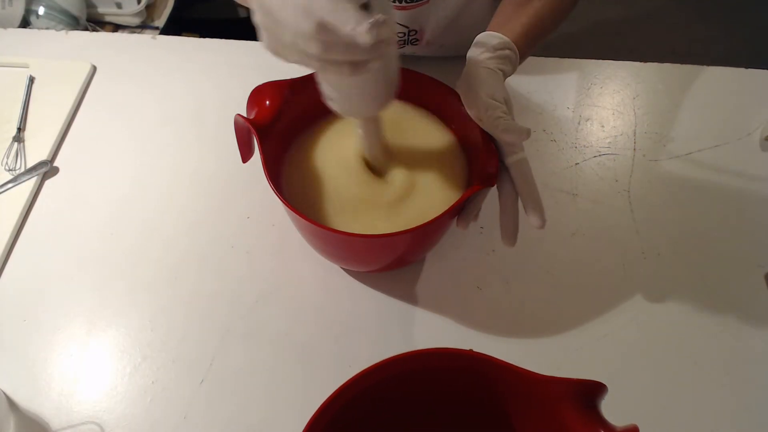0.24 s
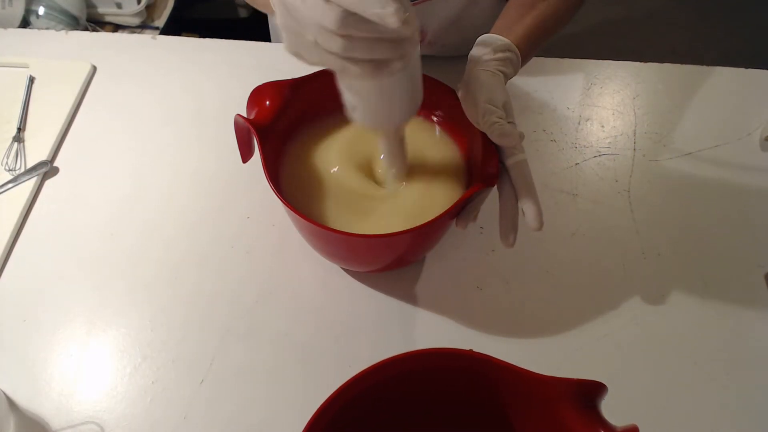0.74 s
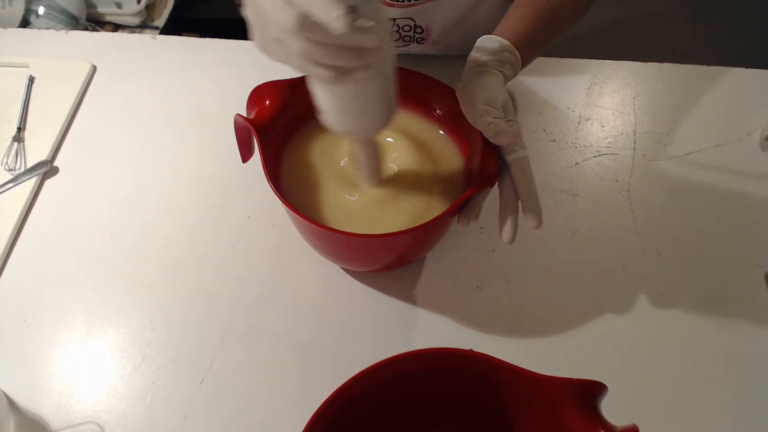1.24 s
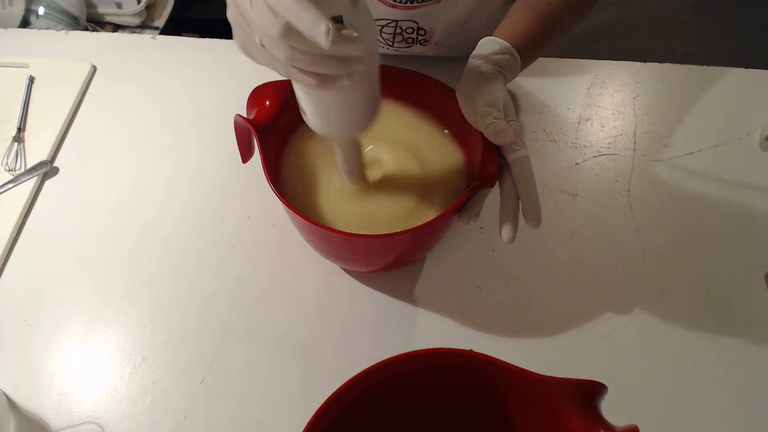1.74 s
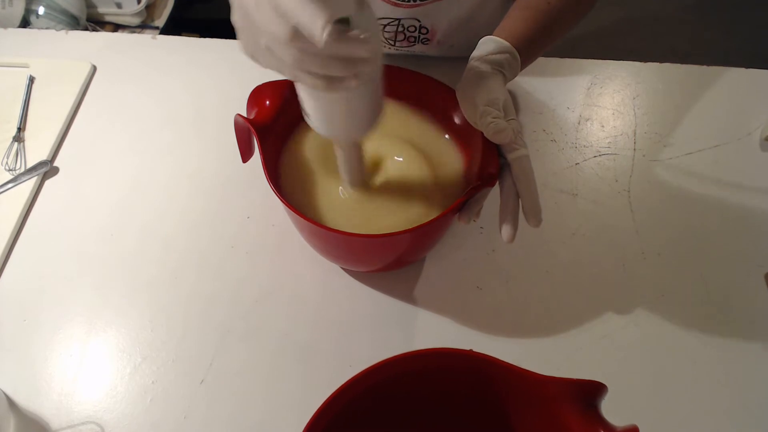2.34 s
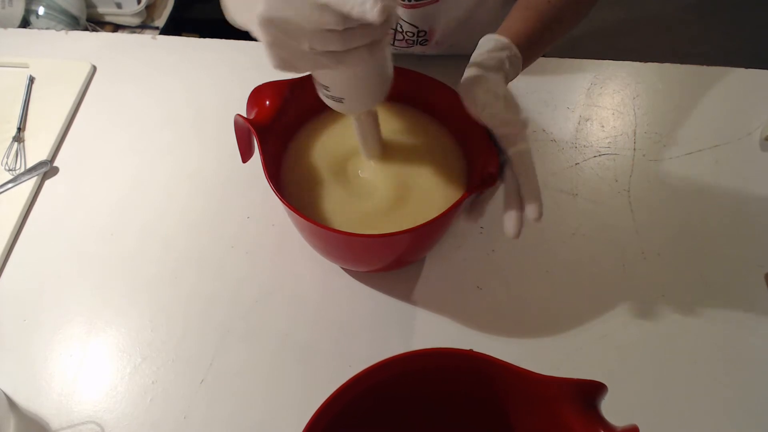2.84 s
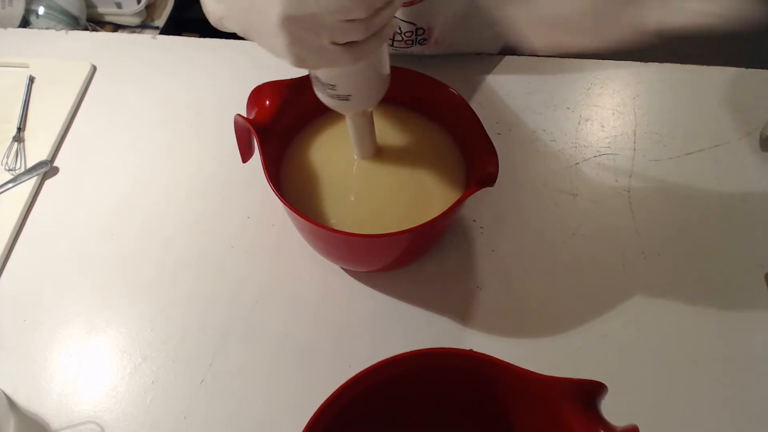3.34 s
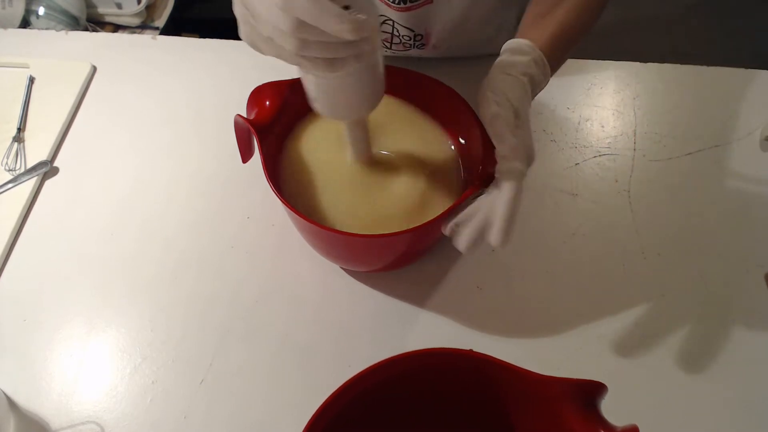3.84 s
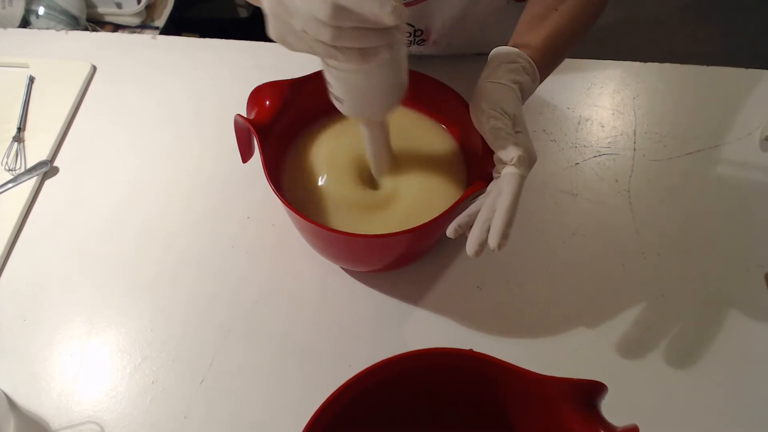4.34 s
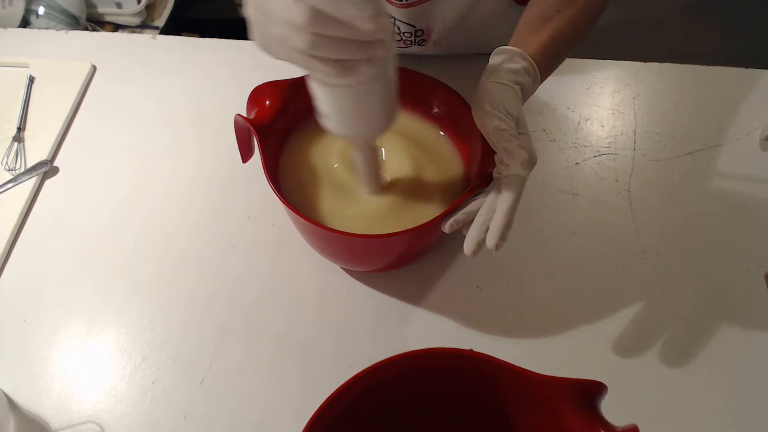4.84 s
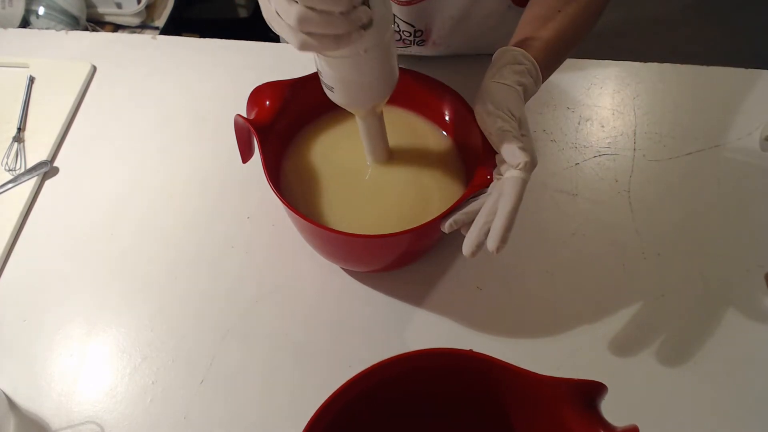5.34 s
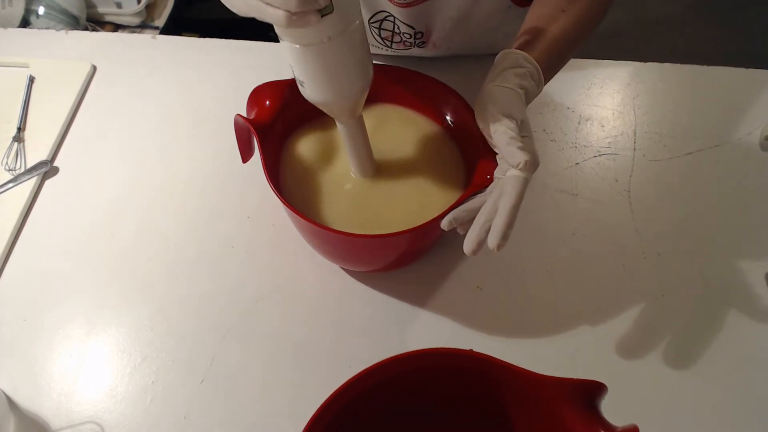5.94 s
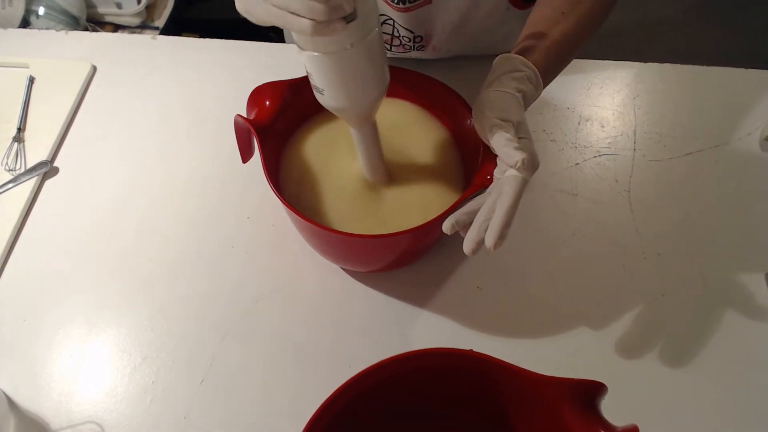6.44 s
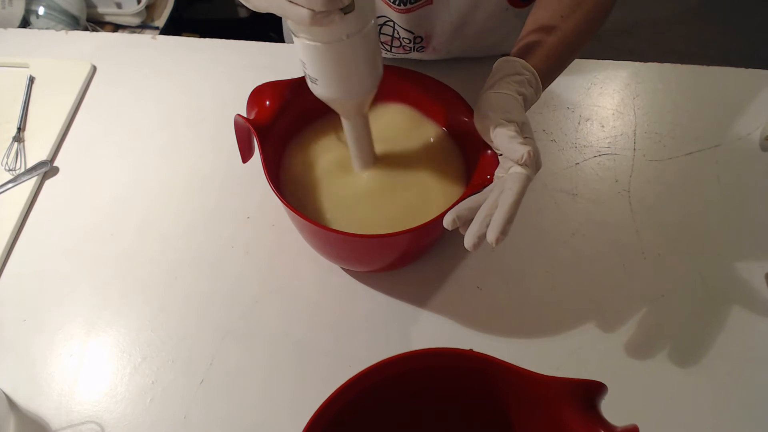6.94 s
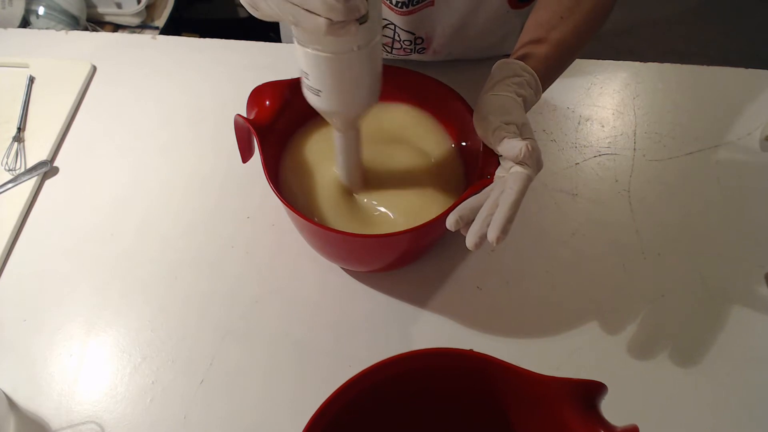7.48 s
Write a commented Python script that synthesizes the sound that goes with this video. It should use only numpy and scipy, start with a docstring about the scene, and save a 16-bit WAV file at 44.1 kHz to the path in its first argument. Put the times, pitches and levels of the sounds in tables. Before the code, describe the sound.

In a quiet kitchen, heard close and dry in mono, a stick blender still switched off bumps around a plastic bowl of thick batter. From 0.1 to 2.8 seconds irregular, hollow knocks cluster, the stronger ones near 0.9, 1.2, 1.5, 1.75 and 2.4, with low table thumps, short plastic cracks and very faint wet slides. Sound cuts out completely around 2.7 to 2.8. After a near-quiet pause, a strong knock lands at 3.55, followed by softer ones until 4.9. A glove rubs the housing, with a sharp click at 4.94. At 5.1 the motor spins up within a fraction of a second to a buzzing whine, bright brush hiss and surging low blade hum. Around 6.1 the treble drops sharply; muffled hum pulses on with churning and wet gulps near 6.0 to 6.4, a low thud at 7.0, and dry ticks at 6.2, 6.6, 7.3 and 7.55. The motor still runs at the end, 7.7.

```python
"""Knocks in a plastic bowl on a table come first: a stick blender, still off, is stirred through thick batter.
Damped modes make the knocks and band-limited noise the squelches; the grip rubs and clicks.
Then the motor spins up: shaft harmonics whine and hum, and noise bursts give brush hiss and churned batter.
Dry ticks with a low thud, a short reverberation and a faint noise floor join in; later the treble drops.
A close mono microphone with a noise gate hears it; the sound cuts out once before the motor starts."""
import sys
import numpy as np
from scipy import signal
from scipy.fft import rfft, irfft, next_fast_len
from scipy.io import wavfile
from scipy.ndimage import uniform_filter1d, map_coordinates

SR = 44100
rng = np.random.default_rng(int(sys.argv[2]) if len(sys.argv) > 2 else 0)


def file_out(sig):
    """Save sig as 16-bit WAV at sys.argv[1]."""
    # one column per channel
    cols = np.atleast_2d(sig).T
    # limit, then scale
    lim = np.clip(cols, -1, 1)
    pcm = np.round(lim * 32767).astype(np.int16)
    wavfile.write(sys.argv[1], SR, pcm)


N = 340011
T = np.arange(N) / SR

# modes of the filled bowl on the table, before the hand damps them: (f/Hz, relative level/dB, t60/s)
BOWL_MODES = [(66.6, -11, 1), (133.6, 4.5, 0.28), (225.5, 5, 0.076), (302.8, -3.5, 0.17),
              (359.3, -10, 0.085), (479.5, -10, 0.069), (570.4, -3.5, 0.069), (680.2, -10.5, 0.12),
              (1006, 0.5, 0.091), (1119, 0.5, 0.054), (1270, 5, 0.03), (1350, -8, 0.086),
              (1710, -9.5, 0.12), (2050, -14.5, 0.19), (2820, -20.5, 0.22)]
# low knocks: stirring strokes, then a thud of the grip and a gulp at the running blade:
# (t/s, table thump level/dB, bowl body level/dB, bowl wall level before a 5 dB cut/dB)
BLOWS = [(.097, -60, -31.5, -50.5), (0.253, -51, -53, -68), (.373, -43, -32, -55),
         (.397, -49, -38.5, -41.5), (0.448, -41.5, -37.5, -46), (0.617, -36.5, -34, -43),
         (0.719, -44, -38, -60), (.887, -42, -32.5, -39), (.909, -46, -35.5, -54), (.93, -28.5, -29, -34.5),
         (0.99, -36.5, -36, -50.5), (1.155, -51, -31.5, -40.5), (1.172, -48, -39.5, -43),
         (1.203, -25, -25.5, -32.5), (1.284, -42.5, -33.5, -42), (1.47, -34, -25, -34),
         (1.503, -29.5, -28, -32), (1.574, -40, -36, -46), (1.747, -25.5, -26.5, -32),
         (1.797, -36, -38, -46.5), (2.014, -39, -50.5, -70), (2.066, -51, -35, -48.5),
         (2.313, -36.5, -28.5, -42), (2.369, -27, -28, -33), (2.439, -45, -35, -45.5),
         (2.586, -53, -41, -64), (2.813, -36, -35.5, -43.5), (3.555, -22, -25.5, -27),
         (3.659, -39, -30.5, -44.5), (3.734, -40, -33, -43.5), (3.972, -64, -27.5, -35.5),
         (4.06, -57.5, -40.5, -54.5), (4.257, -45, -32, -45), (4.341, -50, -42.5, -60),
         (4.574, -36, -27.5, -44), (4.613, -40, -38.5, -49.5), (4.669, -43, -40.5, -58.5),
         (4.855, -62.5, -40, -47), (7.04, -30.5, -35, -77)]
SWITCH_ON_S = 5.117


def amp(db):
    """Level law: decibels to amplitude gain."""
    return 10 ** (np.asarray(db) / 20)


def unit(x):
    """Power normalisation: scale to rms 1."""
    return x / np.sqrt(np.mean(x ** 2) + 1e-20)


def struck(x):
    """Onset normalisation: scale a blow to rms 1 over its first fortieth of a second."""
    return x / np.sqrt(np.mean(x[:SR // 40] ** 2) + 1e-20)


def along(points, hz):
    """Logarithmic frequency scale: interpolate (f/Hz, value) points along it."""
    f, v = np.transpose(points)
    return np.interp(np.log(hz + 1), np.log(f + 1), v)


def curves(rows):
    """Linear interpolation in time: one signal for each column after the time."""
    s, *cols = np.transpose(rows)
    return [np.interp(T, s, c) for c in cols]


def wobble(rate):
    """Slow random modulation: a smooth curve through rate random knots a second."""
    return map_coordinates(rng.standard_normal(int(N * rate / SR) + 4), [T * rate])


def filtered(x, response):
    """Linear filtering: multiply the spectrum by a response of frequency."""
    m = next_fast_len(len(x) + 8192)
    return irfft(rfft(x, m) * response(np.fft.rfftfreq(m, 1 / SR)), m)[:len(x)]


def noise(spectrum, size=N):
    """Spectral shaping: white noise coloured by (f/Hz, relative level/dB) points, rms 1."""
    return unit(filtered(rng.standard_normal(size), lambda hz: amp(along(spectrum, hz))))


def add(track, s, sound):
    """Superposition: mix a sound into the track at s seconds."""
    part = track[round(s * SR):][:len(sound)]
    part += sound[:len(part)]


def ringing(modes, t, scatter_db, detune):
    """Modal decay: a damped sine per mode, its strength and pitch varying with the point of contact."""
    hz, db, t60 = np.transpose(modes)[:, :, None]
    strength, shift = rng.standard_normal((2, len(modes), 1))
    level = amp(db + scatter_db * strength - 60 * t / t60)
    return level * np.sin(2 * np.pi * hz * (1 + detune * shift) * t)


def table_thump(t, group):
    """Contact stiffening: the thump starts sharp while the head presses on the bowl, then settles."""
    bend, bend_s = 0.43, 0.013  # mean fractional rise in pitch, settling time in s
    press = 2 * rng.random()  # the hand bears down differently on every blow
    bent = t + press * bend * bend_s * (1 - np.exp(-t / bend_s))
    modes = ringing(BOWL_MODES, bent, scatter_db=1.5, detune=.012)
    return struck(modes[group == 1].sum(axis=0) * (1 - np.exp(-t / .003)))


def bowl_ring(t, group):
    """Repeated excitation: slaps of batter ring the modes of body and wall anew after a blow."""
    rate, patter_db, patter_t60 = 130, -9.5, 0.23  # slaps per second, dB relative to the blow, s
    modes = ringing(BOWL_MODES, t, scatter_db=2.5, detune=.007)
    slaps = (rng.random(len(t)) < rate / SR) * rng.standard_normal(len(t))
    patter = slaps * amp(patter_db - 60 * t / patter_t60)
    patter[0] = 1  # the blow itself
    return [struck(signal.fftconvolve(modes[part].sum(axis=0), patter)[:len(t)])
            for part in (group % 2 == 0, group == 3)]


def contact_noise(t, wall_db, square_db):
    """Impact and friction: a broadband crack, then a scrape as the rim chatters along the bowl."""
    # contact noise of a landing, before its treble is set: (f/Hz, relative level/dB)
    crack_tone = [(300, -35.5), (600, -3.5), (830, -7.5), (1200, 9), (1500, -4), (1950, 0.5), (2400, -6),
                  (2900, -2.5), (3700, -17.5), (4700, -11), (6000, -21), (8000, -28)]
    glance_db, square_grows = -11.5, 0.93  # treble of a glancing blow, dB per dB of squareness
    knots = t[::SR // 250]
    chatter = amp(3.5 * np.interp(t, knots, rng.standard_normal(len(knots))))
    # light contacts are mostly scrape
    scrape_db = -12.0 - 0.19 * (wall_db + 39.5) - 0.12 * square_db
    scrape = amp(scrape_db - 60 * t / 0.15) * chatter
    bright_db = glance_db + square_grows * square_db
    # the treble change fades in over the octave above 1900 Hz
    colour = [(hz, db + bright_db * np.clip(np.log2(hz / 1900), 0, 1)) for hz, db in crack_tone]
    return struck(noise(colour, size=len(t)) * (amp(-60 * t / 0.0086) + scrape))


def knocks():
    """Modal impact: each blow thumps the table, rings the bowl and shakes the batter."""
    # shaken batter: (f/Hz, relative level/dB)
    slosh_tone = [(30, -18), (70, 9), (110, -5), (220, 1), (330, -4.5), (480, -8), (680, -6), (850, -18.5),
                  (2000, -64.5)]
    slosh_db, contact_db = -2.5, 0.5  # relative to the bowl's body and to its wall
    square_from_db = -37  # a thump above this is a square landing
    guard_db, guard_grows = -84.5, 2.22  # steel blade guard: lowest level, dB per dB of squareness
    out, t = np.zeros(N), np.arange(SR // 3) / SR
    # group 1 is the table thump, 0 and 2 the bowl's body, 3 its wall
    group = np.digitize([m[0] for m in BOWL_MODES], [100, 218, 900])
    choke = np.exp(-(t / 0.078) ** 3)  # the hand and the batter smother the ring
    steel = np.sin(2 * np.pi * 5530 * t) * np.exp(-((t - .046) / .024) ** 2)
    for s, thump_db, body_db, wall_db in BLOWS:
        square_db = max(thump_db - square_from_db, 0)
        thump = table_thump(t, group)
        body, wall = bowl_ring(t, group)
        contact = contact_noise(t, wall_db, square_db)
        slosh = noise(slosh_tone, size=len(t)) * amp(-60 * t / 0.33) * (1 - np.exp(-t / 0.0007))
        blow = amp(thump_db) * thump + amp(body_db) * (body + amp(slosh_db) * slosh)
        blow += amp(wall_db - 5.0) * (wall + amp(contact_db) * contact)
        # batter softens the onset of light and glancing blows; time constant in s
        cushion = np.clip(0.0015 * amp(-.5 * (wall_db + 37.0) - 0.59 * square_db), .0008, .012)
        add(out, s, blow * choke * (1 - np.exp(-t / cushion)))
        if square_db > 0:  # only square landings ring the guard
            add(out, s, amp(guard_db + guard_grows * square_db) * steel)
    return out


def smears():
    """Frictional and bubble noise: batter and gloves hiss as they slide, and the running blade gulps."""
    # wet smears, rubs and gulps, faint to loud: (t/s, length before stretching/s, level/dB, centre f/Hz)
    wet_sounds = [(0.391, 0.026, -59.5, 3480), (0.61, 0.2, -75.5, 5100), (0.582, 0.12, -61, 1770),
                  (2.049, 0.17, -70, 5260), (2.058, 0.19, -58, 1350), (2.788, 0.037, -52, 3340),
                  (2.795, 0.26, -63, 2630), (2.962, 0.25, -68.5, 6200), (3.029, 0.05, -68, 3040),
                  (3.106, 0.032, -63, 2760), (3.196, 0.066, -73, 2920), (3.223, 0.046, -70, 6370),
                  (3.545, 0.14, -61.5, 5800), (3.683, 0.07, -58, 1880), (3.788, 0.17, -58.5, 327),
                  (4.052, 0.11, -77, 1660), (5.974, 0.039, -40, 1020), (6.146, 0.32, -45.5, 660),
                  (6.345, 0.077, -35.5, 416), (6.349, 0.038, -36, 1060), (6.333, 0.057, -42.5, 69),
                  (6.956, 0.054, -43.5, 88)]
    out, grain = np.zeros(N), amp(2.2 * wobble(160))
    # batter slides after each knock, 43 dB under the thump
    slides = [(s, 0.072, thump_db - 43, 5400) for s, thump_db, *_ in BLOWS]
    for s, length, db, centre_hz in wet_sounds + slides:
        u = np.linspace(0, 1, int(length * SR * 1.124))  # stretched length
        band = [(centre_hz / 4, -26), (centre_hz / 1.4, -11), (centre_hz, 0),
                (centre_hz * 1.4, -12), (centre_hz * 3, -28), (centre_hz * 8, -60)]
        # the pocket of air changes shape, so its pitch wanders
        bends = map_coordinates(rng.standard_normal(8), [u * length * 20], mode="mirror")
        pitch = np.exp(.1 * bends)
        squelch = map_coordinates(noise(band, size=len(u)), [np.cumsum(pitch)], mode="mirror")
        add(out, s, amp(db) * squelch * unit(u * (1 - u) ** 2))
    return out * unit(grain)


def shaft_speed():
    """Exponential run-up: turns per second approach a running speed that wanders with the batter's drag."""
    # running speed: (t/s, turns per second)
    running_points = [(5.7, 156.6), (6.05, 156.2), (6.35, 155.4), (6.53, 157.3), (6.76, 157.1),
                      (6.9, 155.9), (7.15, 156.4), (7.5, 156.1), (7.7, 155.3)]
    start_hz, spin_up_s = 48, .071
    running, = curves(running_points)
    return running - (running - start_hz) * np.exp(-np.maximum(T - SWITCH_ON_S, 0) / spin_up_s)


def swells(rows):
    """Load modulation: the batter's load on the blade as a gain that builds up, holds and lets go."""
    attack_s, release_s = 0.048, 0.026

    def ramp(u):
        return np.sin(np.pi / 2 * np.clip(u, 0, 1)) ** 2

    gains = [amp(db) * ramp((T - s) / attack_s) * ramp(1 - (T - s - length) / release_s)
             for s, length, db in rows]
    return np.max(gains, axis=0)


def motor(pace, shaft, mains):
    """Sidebands and resonance: mains torque splits the commutator's orders; brush noise excites the shell."""
    # lines of the whine: (multiple of the shaft speed, offset in mains cycles)
    whine_lines = [(12, -4), (12, -1), (12, 0), (24, -2), (24, -1), (24, 1), (30, -1), (30, 0), (36, -1),
                   (36, 1), (48, -2)]
    # their levels at top speed, in the same order: level/dB
    whine_levels = [-51.5, -39.5, -42.5, -55, -54.5, -49.5, -53, -55.5, -48, -55, -55]
    # brush noise at top speed: (f/Hz, relative level/dB)
    brush_tone = [(300, -40), (700, -6.5), (950, -1), (1400, 5), (2000, 6.5), (2700, -0.5), (4100, -8),
                  (5200, 0.5), (6600, -4), (7800, -2)]
    # resonances of the shell: (f/Hz, width/Hz, relative level/dB)
    shell_modes = [(1426, 18, -11), (3740, 170, 1), (4615, 200, -1.5), (5520, 450, -2.5), (7350, 240, -1.5)]
    drift = wobble(1.875)  # the whine swells and ebbs as the hand turns the housing
    whine = np.zeros(N)
    for (k, side), db in zip(whine_lines, whine_levels):
        level = amp(db + 1.2 * wobble(8) + 1.5 * drift)
        whine += level * np.sin(k * shaft + side * mains + .2 * wobble(25))

    def shell(f):
        return sum((-1) ** k * amp(db) * 1j * f * w / (c * c - f * f + 1j * f * w)
                   for k, (c, w, db) in enumerate(shell_modes))

    # the brushes scrape in step with the shaft, brighter as it speeds up
    scrape = unit(1 + .2 * np.cos(5 * shaft))
    brushes = map_coordinates(noise(brush_tone), [np.cumsum(np.sqrt(pace))])
    shell_noise = unit(filtered(rng.standard_normal(N), shell))
    hiss = scrape * (amp(-34.3) * brushes + amp(-44) * shell_noise)
    fan = np.sin(5 * shaft + .2 * wobble(20))  # five-bladed cooling fan
    return pace * hiss + pace ** 3 * (whine + amp(-52.5) * fan)


def blade(speed, pace, shaft, mains):
    """Blade-passing harmonics: two wings hum under the batter's load while torn batter makes noise."""
    # the batter grips the blade: (t/s, length/s, hum level before a 1.5 dB lift/dB)
    bites = [(5.215, 0.072, -35), (5.257, 0.17, -27.5), (5.39, 0.21, -33), (5.67, 0.26, -33),
             (5.784, 0.076, -28.5), (5.953, 0.037, -20), (6.003, 0.41, -25.5), (6.279, 0.064, -18.5),
             (6.5, 0.14, -31), (6.691, 0.078, -29), (6.897, 0.37, -38.5), (6.988, 0.21, -24.5),
             (7.247, 0.061, -23.5), (7.374, 0.055, -33.5), (7.539, 0.12, -36.5), (7.68, .05, -23)]
    # the blade draws in air and growls: (t/s, length/s, level/dB)
    growls = [(5.19, 0.16, -49), (6.14, 0.17, -43)]
    # churning noise, before a 0.15 dB cut; the overtones start from 8 dB below: (t/s, level/dB)
    churn_levels = [(5.13, -43.5), (6.05, -38), (6.13, -48), (6.16, -39), (6.38, -44.5), (6.5, -43),
                    (6.9, -58), (7.06, -44), (7.24, -55.5), (7.3, -47), (7.35, -54), (7.68, -51.5)]
    # batter torn by the blade: (f/Hz, relative level/dB)
    churn_tone = [(30, -52), (65, 4.5), (100, -30), (160, -2.5), (230, -7), (330, 2.5), (450, 3),
                  (620, -3.5), (760, -6), (950, -13.5), (2000, -50)]
    churn_db, = curves(churn_levels)
    hum = np.hypot(swells(bites), amp(-45) * pace ** 2)  # the second term is the free hum
    # two wings pass twice a turn; the batter loads them unevenly
    uneven = amp(1.3 * wobble(45)) * (1 + .15 * np.cos(mains))
    wings = uneven * np.sin(2 * shaft + .25 * wobble(35))
    out = amp(1.5) * hum * wings
    # the once-a-turn shake swells as the shaft runs up through the bowl's main mode
    resonance = amp(-44) * np.exp(-((speed - BOWL_MODES[1][0]) / 12.2) ** 2)
    shake = hum * amp(-20.5) + resonance
    out += shake * amp(6.0 * wobble(25)) * np.sin(shaft + 0.12 * wobble(27))

    def overtone(k):
        return amp(3 * wobble(60)) * np.sin(k * shaft + .6 * wobble(70))

    out += amp(churn_db - 8) * (overtone(3) + overtone(4))
    out += swells(growls) * (overtone(4) + overtone(5) / 2)
    lumps = unit(amp(2.5 * wobble(70)))
    return out + amp(churn_db - 0.15) * noise(churn_tone) * lumps


def blender():
    """Rotating source: motor and blade share one shaft phase, the integral of its speed."""
    speed = shaft_speed()
    pace = speed / speed.max()
    on = np.clip((T - SWITCH_ON_S) / 0.0026, 0, 1)
    shaft = 2 * np.pi * np.cumsum(speed * (1 + .0005 * wobble(40))) / SR
    mains = 2 * np.pi * 60 * T
    return on * (motor(pace, shaft, mains) + blade(speed, pace, shaft, mains))


def handling():
    """Friction and snap: the glove rubs over the housing, whose damped modes ring as it clicks."""
    # the hand shifts on the housing: (t/s, level/dB)
    grip_levels = [(4.78, -74), (4.81, -53), (4.87, -48.5), (4.95, -38), (5.01, -52.5), (5.06, -76)]
    # colour of the rub: (f/Hz, relative level/dB)
    grip_tone = [(300, -12.5), (1100, -3), (2200, -3), (3500, -14.5), (6800, -12.5), (8000, -14)]
    # the housing and its switch click: (t/s, level before a 9.5 dB cut/dB)
    snaps = [(4.936, -23.5), (4.943, -39.5), (5.121, -75.5)]
    # modes of the housing: (f/Hz, relative level/dB, t60/s)
    housing_modes = [(1132, 4, 0.081), (1365, -0.5, 0.05), (2180, -1, 0.064), (4170, 7, 0.0059),
                     (6760, 1.5, 0.024)]
    grip_db, = curves(grip_levels)
    held = (T > grip_levels[0][0]) & (T < grip_levels[-1][0])
    out = held * amp(grip_db) * noise(grip_tone) * unit(amp(4.3 * wobble(180)))
    t = np.arange(SR // 5) / SR
    snap_tone = [(500, -58), (1200, 23.0), (4000, -1.5), (6500, 15.0), (8000, -4.5)]
    for s, db in snaps:
        crack = noise(snap_tone, size=len(t)) * amp(-60 * t / 0.029)
        ring = ringing(housing_modes, t, scatter_db=1.5, detune=.003).sum(axis=0)
        add(out, s, amp(db - 9.5) * (struck(ring) + amp(2.5) * struck(crack)))
    return out


def ticks():
    """Impulsive transient: each tick is a fast-damped cosine on a stronger, longer low bump."""
    # dry ticks with a low thud: (t/s, level of the cosine/dB)
    tick_rows = [(0.426, -47.5), (.488, -39), (1.536, -38), (6.161, -30.5), (6.567, -29.5), (7.322, -29),
                 (7.55, -39.5)]
    out, t = np.zeros(N), np.arange(SR // 100) / SR
    click = np.exp(-t / 0.000061) * np.cos(2 * np.pi * 1500 * t)
    bump = 2.1 * np.exp(-t / 0.00067)
    for s, db in tick_rows:
        add(out, s, amp(db) * (click + bump))
    return out


def kitchen(x):
    """Diffuse reverberation: convolve with decaying noise, as in a small room whose treble dies first."""
    # decay of the room: (f/Hz, t60/s)
    room_decay = [(150, 0.54), (2000, 0.32), (8000, 0.19)]
    hz, t, z = signal.stft(rng.standard_normal(SR // 2), SR, nperseg=256)
    decay = amp(-60 * t / along(room_decay, hz)[:, None])
    tail = signal.istft(z * decay, SR, nperseg=256)[1]
    delayed = np.pad(tail / np.linalg.norm(tail), (SR // 150, 0))
    return signal.fftconvolve(x, delayed)[:N]


def quiet_room():
    """Stationary noise: the faint coloured floor of a quiet kitchen."""
    # (f/Hz, relative level/dB)
    floor_tone = [(30, -17), (140, -3.5), (700, -11), (1700, -16.5), (3300, -26.5), (8000, -32)]
    return amp(-72.0) * noise(floor_tone)


def treble_drop(x):
    """Time-varying filtering: crossfade to a dulled spectrum, which then stays."""
    # (f/Hz, gain/dB)
    dull_tone = [(600, -2), (800, -10), (1050, -14.5), (1800, -16.5), (4200, -14.5), (4600, -11.5),
                 (5000, -16.5), (8000, -16.5)]
    dulled = np.clip((T - 6.115) / 0.024, 0, 1)
    return (1 - dulled) * x + dulled * filtered(x, lambda hz: amp(along(dull_tone, hz)))


def scene():
    """Superposition of near sources: all are close to the microphone, alike in both channels."""
    stirring = knocks() + smears() + handling()
    mono = stirring + amp(-23.0) * kitchen(stirring) + blender() + quiet_room()
    mono = treble_drop(mono) + ticks()  # the ticks keep their treble
    return np.array([mono, mono])


def record(dry, gate_db=-56, depth_db=7):
    """Level-dependent gain and band limiting: a gate shortens the tails, and the sound cuts out once."""
    # the sound cuts out: (start t/s, end t/s)
    gap = (2.684, 2.787)
    top_hz = 8250
    level_db = 10 * np.log10(np.abs(uniform_filter1d(dry[0] ** 2, size=900)) + 1e-12)
    gate = amp(np.clip(0.27 * (level_db - gate_db), -depth_db, 0))
    gain = gate * ((T < gap[0]) | (T > gap[1]))
    edge = [(7400, 0), (7800, -11), (8200, -32)]  # (f/Hz, gain/dB)
    low_cut = signal.butter(2, 48, "highpass", fs=SR, output="sos")

    def band(hz):
        return amp(along(edge, hz)) * (hz < top_hz)

    return np.array([filtered(signal.sosfilt(low_cut, x) * gain, band) for x in dry])


dry = scene()
out = record(dry)
file_out(out)
```